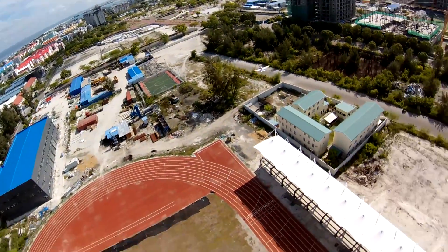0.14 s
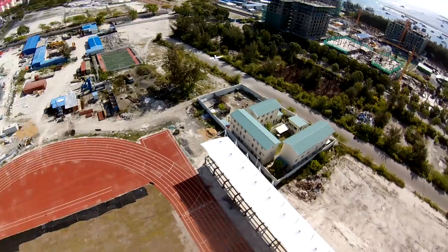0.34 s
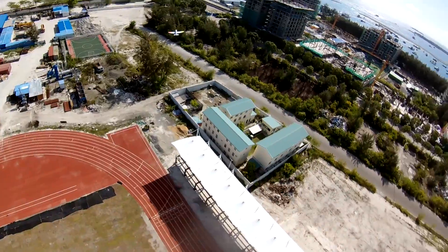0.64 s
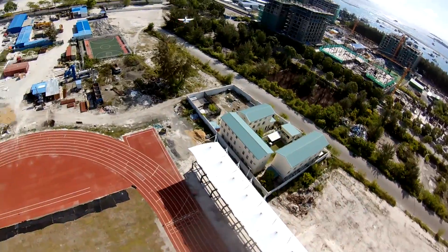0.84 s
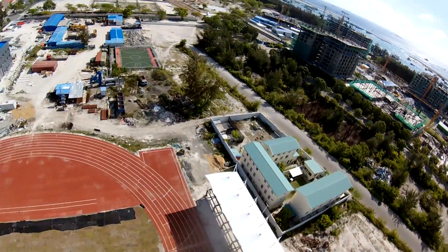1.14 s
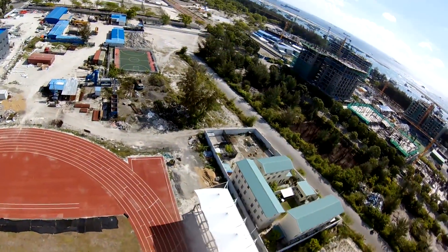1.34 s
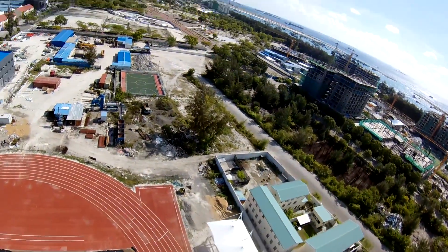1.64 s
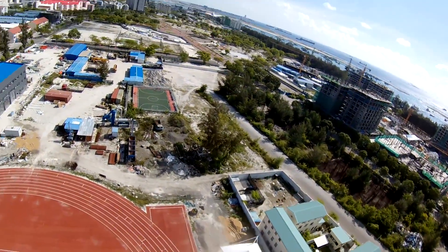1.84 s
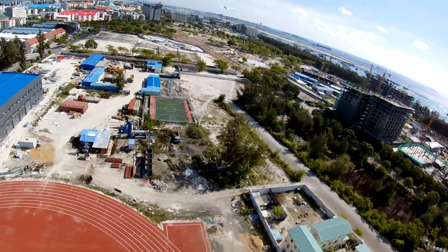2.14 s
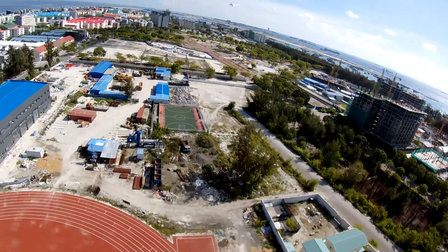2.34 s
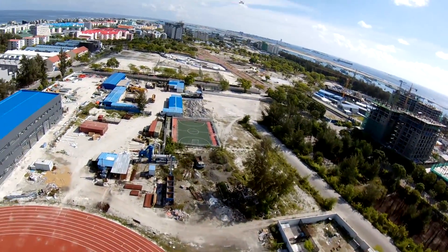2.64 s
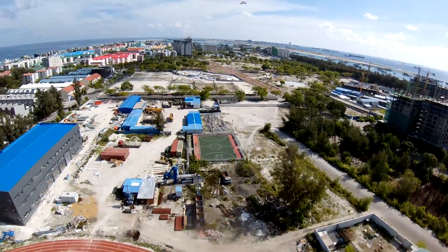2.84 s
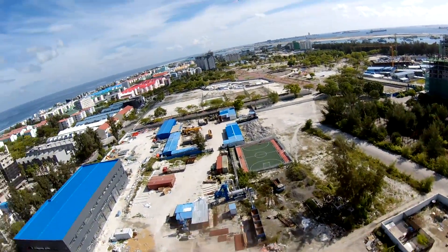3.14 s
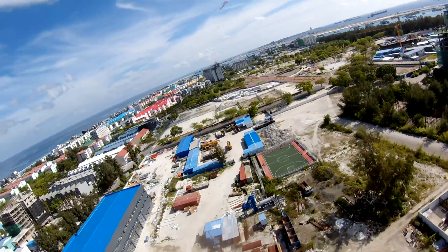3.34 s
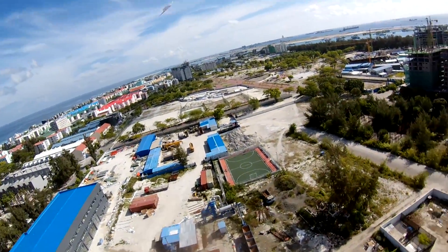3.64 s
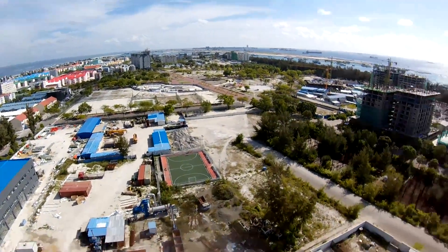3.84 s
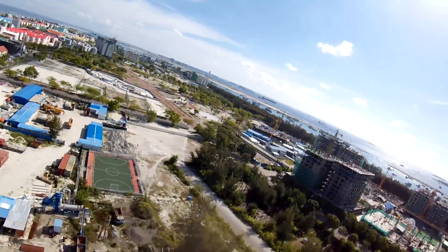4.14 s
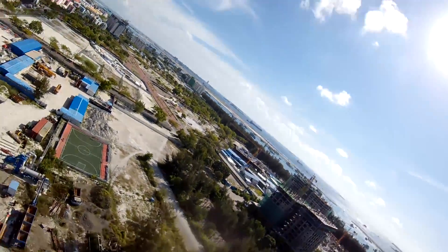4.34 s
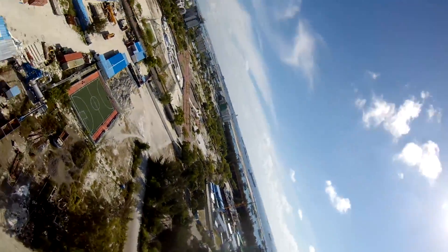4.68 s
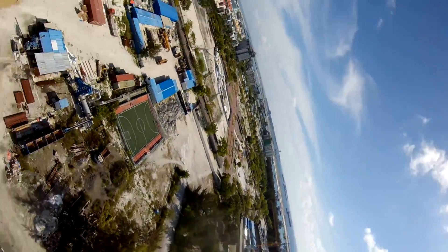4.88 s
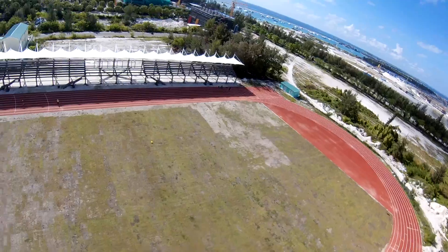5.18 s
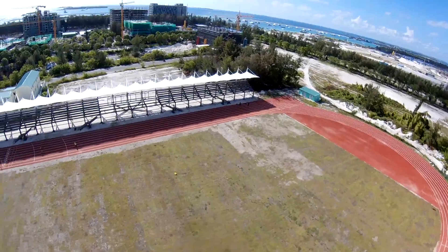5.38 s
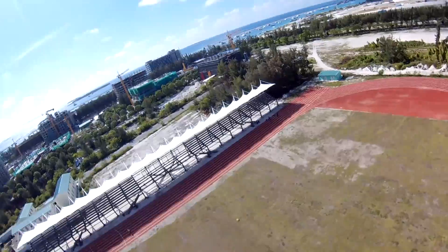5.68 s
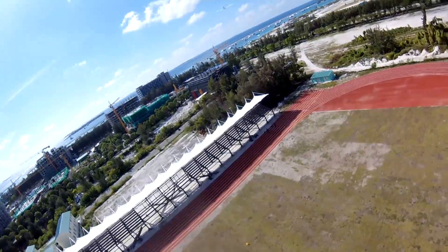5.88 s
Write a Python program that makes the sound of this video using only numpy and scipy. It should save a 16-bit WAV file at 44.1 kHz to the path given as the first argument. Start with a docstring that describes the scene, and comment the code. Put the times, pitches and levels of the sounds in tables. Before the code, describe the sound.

From the start, low-to-middle wind noise rushes over a microphone mounted on a gliding model plane, with short gusts swelling until about 1.4 s and the rush growing fuller after 1 s. A very faint whistle slides downward in the first 0.3 s; from about 1.1 to 3.4 s a similar thin, slightly wavering note with a weaker undertone rises gently and sinks again. At 3.45 s the electric motor catches, with a short nasal rasp near 3.6 s. It spools up in surges around 3.7 and 4.1 s, a gritty cluster of whines climbing above a growing low hum, steady by about 4.5 s, its whine easing while the wind strengthens. At 5.15 s a dry tick marks an abrupt cut: wind becomes louder and faster, the motor hums on steadily beneath, and from 5.6 s bright, spitting bursts crackle through buffeting gusts until 6 s.

```python
"""Air rushes past a microphone on a model plane: shaped noise whose level follows gusts of turbulence.
Over it a freewheeling propeller whistles faintly, a gliding sine with a weaker undertone.
The electric motor then throttles up: unbalance hums at the shaft rate, ball bearings whine at multiples
of it through the airframe's resonances, and the blades add narrow bands of noise.
A hard splice, marked by a tick, jumps to a faster, windier stretch with bright spitting gusts."""
import sys
import numpy as np
from scipy import signal
from scipy.fft import rfft, irfft
from scipy.io import wavfile

SR = 44100
rng = np.random.default_rng(int(sys.argv[2]) if len(sys.argv) > 2 else 0)


def master(y):
    """Save y as 16-bit WAV."""
    cut = np.clip(np.atleast_2d(y).T, -1, 1)
    pcm = np.round(cut * 32767)  # scale
    wavfile.write(sys.argv[1], SR, pcm.astype(np.int16))


N = 265318
TIME = np.arange(N) / SR
BINS_HZ = np.maximum(np.arange(N // 2 + 1) * SR / N, 1)
SPLICE_S, MOTOR_ON_S = 5.148, 3.45
FULL_TURNS_PER_S = 257   # reference shaft speed


def from_db(db):
    """Level: decibels become an amplitude ratio."""
    return 10 ** (np.asarray(db) / 20)


def rms_one(x):
    """Normalisation: scale a signal to rms 1."""
    return x / np.sqrt(np.mean(x ** 2) + 1e-20)


def in_time(rows):
    """Linear interpolation: each column of a timed table at every sample."""
    s, *columns = np.transpose(rows)
    return [np.interp(TIME, s, column) for column in columns]


def gain_at(points, hz):
    """Frequency response: the gain of a (f/Hz, level/dB) table, read on a log-frequency axis."""
    table_hz, table_db = np.transpose(points)
    return from_db(np.interp(np.log(hz), np.log(table_hz), table_db))


def noise(gains):
    """Spectral shaping: white noise with one gain per frequency bin, at rms 1."""
    return rms_one(irfft(rfft(rng.standard_normal(N)) * gains, N))


def drift(rate, size=8192):
    """Low-passed chance: a random curve of rms 1 that swings up to about `rate` times a second."""
    hz = np.arange(size // 2 + 1) * SR / N
    slow = irfft(rfft(rng.standard_normal(size)) / (1 + (hz / rate) ** 4))
    return np.interp(np.arange(N) * size / N, np.arange(size), rms_one(slow))


def tone(hz):
    """Phase is the integral of frequency: a sine of rms 1 that follows a pitch curve."""
    cycles = np.cumsum(hz) / SR + rng.random()
    return np.sqrt(2) * np.sin(2 * np.pi * cycles)


def swell(centre_s, length_s):
    """Gaussian envelope: a bell of height 1, `length_s` wide at half height."""
    return np.exp(-np.log(2) * (2 * (TIME - centre_s) / length_s) ** 2)


def low_pass(x, edge_hz, power):
    """Zero-phase low-pass: the gain falls to a half at the edge."""
    return irfft(rfft(x) / (1 + (BINS_HZ / edge_hz) ** power), N)


def after_splice():
    """Crossfade: 0 before the splice, 1 from a millisecond after it."""
    return np.clip((TIME - SPLICE_S) / .001, 0, 1)


def with_gusts(rush_db, hiss_db):
    """Unsteady flow: each gust or lull swells and fades on top of the steady level."""
    # gusts, and lulls where negative: centre t/s, length/s, added rush level/dB, added hiss level/dB
    gusts = [(0.217, 0.077, 1.5, 3), (0.306, 0.13, 2.5, -3), (0.428, 0.12, 3.5, 6.5), (.52, .06, 0.5, 2),
             (0.687, 0.2, 4.5, 3), (0.847, 0.031, 3, 1), (1.02, 0.077, 1, 4.5), (1.207, 0.13, 4, -0.5),
             (1.352, 0.1, 3, 0.5), (1.743, 0.24, -1.4, 1), (1.85, 0.064, 2.5, 1.8), (2.685, 0.22, 1.5, -2),
             (2.915, 0.039, 2.5, -4.5), (3.117, 0.05, 2.5, -1.5), (3.297, .07, -1.5, 1),
             (3.383, 0.081, 0.7, 1), (3.7, 0.054, 0.5, -0.5), (3.793, 0.11, -2, 0.5), (4.246, 0.23, 1.5, 2),
             (5.187, 0.073, 1, 1.5), (5.544, 0.14, 4, -1), (5.68, 0.043, -0.5, -2), (5.744, .02, 1, -1.5),
             (5.828, 0.029, 2.5, -1.5), (5.886, 0.052, 5.5, -0.5), (5.98, 0.08, 0, -1.5)]
    for s, length_s, more_rush_db, more_hiss_db in gusts:
        bell = swell(s, length_s)
        rush_db = rush_db + more_rush_db * bell
        hiss_db = hiss_db + more_hiss_db * bell
    return rush_db, hiss_db


def deepened(rush):
    """Spectral balance: the weight of the rush tips between its bass and its middle."""
    # stretches of deeper rush: centre t/s, length/s, added bass-to-middle level difference/dB
    deep_spells = [(1.152, 0.31, 2.5), (1.996, .5, 1.5), (3.55, 0.62, 4), (4.105, 0.81, 1.5)]
    depth_db = sum(db * swell(s, length_s) for s, length_s, db in deep_spells)
    depth_db = depth_db + 1.9 * drift(15)   # eddies tip the balance at random
    bass = low_pass(rush, edge_hz=720, power=4)
    middle = rush - bass
    return bass * from_db(depth_db / 2) + middle * from_db(-depth_db / 2)


def airflow(steady_db, colour, split_hz, buffet_db, flutter_db):
    """Turbulence: large eddies rush and buffet; small ones hiss above them and flutter faster."""
    rush_db, hiss_db = with_gusts(*steady_db)
    low_share = 1 / (1 + (BINS_HZ / split_hz) ** 6)   # share of power in the rush
    shape = gain_at(colour, BINS_HZ)
    buffet = buffet_db * drift(39)
    rush = deepened(noise(shape * np.sqrt(low_share))) * from_db(rush_db + buffet)
    flutter = flutter_db * drift(79)
    hiss = noise(shape * np.sqrt(1 - low_share)) * from_db(hiss_db + buffet + flutter)
    return rush + hiss


def spitting():
    """Flow separation: at high airspeed the flow tears off the microphone port in short bright bursts."""
    # spectrum of the torn flow: f/Hz, relative spectral level/dB
    spit_colour = [(2500, -14.5), (4500, 7), (5700, 2), (6600, -17.5), (8500, -18.5), (11000, -35.5),
                   (14000, -53)]
    # sharp gusts at the port: centre t/s, length/s, peak level/dB
    spits = [(5.59, 0.03, -54), (5.613, .006, -51), (5.643, .022, -56), (5.715, 0.031, -55),
             (5.77, .014, -56), (5.805, 0.045, -51), (5.85, 0.025, -53.5), (5.892, .035, -53)]
    bed_db, flutter_db = -62.5, 4
    flutter = from_db(flutter_db * drift(120))
    spit_noise = rms_one(noise(gain_at(spit_colour, BINS_HZ)) * flutter)
    bursts = sum(from_db(level_db) * swell(s, length_s) for s, length_s, level_db in spits)
    return spit_noise * (from_db(bed_db) + bursts)


def wind():
    """Aerodynamic noise: a slower airflow gives way to a faster, spitting one at the splice."""
    # airflow spectra before and after the splice: f/Hz, relative spectral level/dB
    glide_colour = [(30, -59.5), (70, -33), (130, -18.5), (220, -6), (340, 1), (600, 2), (1200, -3),
                    (1900, -15.5), (2350, -19), (4000, -35), (5600, -54), (6600, -74), (9000, -72.5),
                    (13000, -92.5)]
    fast_colour = [(30, -55), (70, -32), (130, -17), (220, -6), (340, 2), (820, 2), (1300, -3), (1900, -12),
                   (2400, -14), (4000, -26), (5600, -44), (6600, -71.5), (9000, -65.5), (13000, -92)]
    # slow trend of the airflow up to the splice: t/s, rush level/dB, hiss level/dB
    air_trend = [(0.1, -33.5, -48.5), (0.55, -33.5, -45), (1.1, -28, -40.5), (1.6, -27.5, -39),
                 (2.1, -27.5, -42.5), (2.9, -29.5, -40), (3.35, -28, -46.5), (3.65, -28, -41),
                 (3.9, -32, -41.5), (4.6, -32, -44), (5.13, -26, -38.5)]
    fast_db = (-23, -34.5)   # rush and hiss levels without gusts
    glide = airflow(in_time(air_trend), glide_colour, split_hz=2030, buffet_db=0.14, flutter_db=1.25)
    fast = airflow(fast_db, fast_colour, split_hz=1920, buffet_db=0.5, flutter_db=1.56) + spitting()
    after = after_splice()
    return (1 - after) * glide + after * fast


def splice_tick(level_db, decay_s):
    """Waveform step: the cut between two stretches leaves a jump that decays exponentially, a small dry tick."""
    since = np.maximum(TIME - SPLICE_S, 0)
    return from_db(level_db) * (TIME >= SPLICE_S) * np.exp(-since / decay_s)


def freewheel(waver_db):
    """Air-driven rotation: the bearing sings a thin note and a weaker undertone along a pitch parabola."""
    # whistling spells: middle t/s, length/s, mean main-note level/dB, f/Hz at the middle, glide there/(Hz/s)
    whistles = [(.17, .32, -51.5, 2165, -500), (2.25, 2.3, -51.5, 2295, 0)]
    bend_hz_per_s2, undertone_ratio, undertone_db = -128, 0.54, -2
    out = 0
    for s, length_s, level_db, hz, glide in whistles:
        since = TIME - s
        curve_hz = hz + glide * since + bend_hz_per_s2 * since ** 2
        pitch = curve_hz * (1 + 0.00064 * drift(22))
        held = 1 / (1 + (2 * since / length_s) ** 8)
        notes = tone(pitch) + from_db(undertone_db) * tone(undertone_ratio * pitch)
        out = out + notes * held * from_db(level_db + waver_db * drift(11))
    return out


def start_rasp(level_db, delay_s, length_s, centre_hz, width_hz):
    """Resonance: as the motor catches, noise rasps briefly at the airframe's main resonance."""
    resonance = 1 / (1 + (2 * (BINS_HZ - centre_hz) / width_hz) ** 2)
    return noise(resonance) * from_db(level_db) * swell(MOTOR_ON_S + delay_s, length_s)


def shaft_speed():
    """Rotational inertia: each push eases the turns per s up; after the splice they sink to a cruise."""
    # pushes of the throttle: centre t/s, speed gained/(turns/s), easing time/s
    pushes = [(3.705, 60.611, 0.147), (4.047, 16.41, 0.066), (4.167, 66.39, 0.202), (4.987, 4.264, 0.126)]
    idle, after_jump, cruise_floor = 114.1, 258.1, 254.2   # turns per s
    slowing = 7   # turns per s, each second
    climb = idle
    for s, gained, easing_s in pushes:
        climb = climb + gained * (1 + np.tanh((TIME - s) / easing_s)) / 2
    cruise = np.maximum(after_jump - slowing * (TIME - SPLICE_S), cruise_floor)
    return np.where(TIME < SPLICE_S, climb, cruise)


def blades(speed):
    """Amplitude modulation: blades chop turbulent air into narrow noise bands that climb with the shaft."""
    # blurred blade tones: multiple of shaft speed, level/dB at the reference speed, fluctuation rate/Hz
    blade_tones = [(2.09, -39, 26.3), (3.14, -41, 26.1)]
    growth_db_per_octave = 1.5
    out = 0
    for order, level_db, rate_hz in blade_tones:
        angle = 2 * np.pi * order * np.cumsum(speed) / SR
        band = drift(rate_hz) * np.cos(angle) + drift(rate_hz) * np.sin(angle)
        out = out + from_db(level_db) * band
    return out * from_db(growth_db_per_octave * np.log2(speed / FULL_TURNS_PER_S))


def unbalance_hum(speed):
    """Rotating unbalance: one cycle of force a turn, stronger with speed and weaker under a lighter load."""
    full_db, db_per_turn_per_s, after_splice_db = -25, 0.3, -5
    level_db = full_db + db_per_turn_per_s * (speed - FULL_TURNS_PER_S) + after_splice_db * after_splice()
    return tone(speed) * from_db(level_db + 0.36 * drift(10))


def softened(vibration, speed):
    """Impact hardness: slow balls strike softly, so the treble grows with a power of speed."""
    dull = low_pass(vibration, edge_hz=3200, power=8)
    treble = vibration - dull
    return dull + treble * (speed / FULL_TURNS_PER_S) ** 1.6


def bearings(speed, grit_db, grit_edge_hz):
    """Forced vibration: slipping balls drive tones and rolling grit through the airframe's response."""
    # how the airframe radiates vibration: f/Hz, gain level/dB
    airframe = [(150, -12), (300, 0), (800, 0), (1300, -4), (1700, -7), (2000, -3), (2320, 4), (2550, -2),
                (2800, -13), (3100, -17), (3400, -13), (3900, -9), (4400, -12), (4650, -18), (4900, -29),
                (6500, -60), (12000, -90)]
    # bearing tones: multiple of shaft speed, drive level/dB before airframe and load,
    # speed of strongest drive/(turns/s), half-width of that drive/octaves, waver/dB
    bearing_tones = [(1.1, -45, 258, .15, 2), (2.02, -39, 228, .09, 1.5), (2.9, -36, 143, .1, 2),
                     (3.01, -38, 182, .13, 2), (3.09, -38.5, 247, .055, 2), (3.85, -38.5, 161, .08, 2),
                     (5, -44, 264, .07, 2), (6.03, -40, 248, .04, 2), (6.14, -46, 259, .04, 2),
                     (7.1, -44.5, 230, .14, 2), (7.73, -44, 256, .11, 1.5), (8.55, -52, 245, .12, 2),
                     (9.21, -38.7, 229, .21, .5), (9.25, -45, 171, .07, 1.5), (10.17, -46.5, 175, .24, 1.5),
                     (10.75, -51, 204, .14, 1.5), (11.3, -46.5, 209, .09, 1.5), (11.6, -50, 183, .14, 1.5),
                     (11.98, -44, 251, .06, 2), (12.26, -40.5, 192, .125, .7), (12.3, -47, 163, .07, 1),
                     (12.62, -46.5, 245, .14, 2), (13.3, -55, 165, .2, 2), (13.7, -53, 173, .13, 2),
                     (14.33, -50, 162, .1, 1), (14.97, -42.5, 258, .048, 1.5), (15.3, -45, 160, .17, 1),
                     (15.68, -43.5, 214, .13, 1), (15.71, -47.5, 259, .05, 1.5),
                     (16.48, -49, 235, .14, 1.5), (16.95, -55.5, 260, .1, 2), (17.46, -47, 129, .05, 2),
                     (17.95, -40.5, 154, .06, 1), (18.03, -43.5, 218, .13, 1), (18.74, -40.5, 205, .2, 1),
                     (19.57, -49, 191, .11, 1.5), (20.3, -54, 204, .1, 2), (21.07, -46.5, 170, .15, 1.5),
                     (21.8, -44, 192, .18, 1), (22.66, -48.5, 172, .1, 1.5), (24.13, -43, 161, .09, 1),
                     (24.55, -44, 142, .07, 1.5), (24.87, -47, 163, .17, 1), (25.65, -48.5, 158, .09, 1.5),
                     (27.1, -46.5, 152, .07, 1.5), (27.84, -49.5, 154, .09, 1.5), (26.4, -44, 119, .07, 2),
                     (30.6, -52, 142, .07, 2), (34.1, -48, 124, .09, 2)]
    slip_share, spooling_slip_share = 0.001, 0.0036   # pitch wander at full speed; its rise toward standstill
    shared_slip = .85   # part of the wander that all the balls have in common
    load_db, after_splice_db = 1.5, -2.5
    ease_s, ease_db_per_s = 4.51, 5   # once up to speed the bearings quieten, until the splice

    looseness = slip_share + spooling_slip_share * np.maximum(1 - speed / FULL_TURNS_PER_S, 0)
    whine, together = 0, drift(14)
    for order, level_db, best_speed, octaves, depth_db in bearing_tones:
        hz = order * speed
        slip = looseness * (shared_slip * together + (1 - shared_slip) * drift(30))
        waver_db = depth_db * drift(18)
        excited = 1 / np.sqrt(1 + (np.log2(speed / best_speed) / octaves) ** 8)
        # each tone also swells as it climbs through a resonance
        strength = excited * from_db(level_db + waver_db) * gain_at(airframe, hz)
        whine = whine + tone(hz * (1 + slip)) * strength

    high_pass = 1 / (1 + (grit_edge_hz / BINS_HZ) ** 4)
    grit = from_db(grit_db) * noise(gain_at(airframe, BINS_HZ) * high_pass)
    settled_s = np.clip(TIME, ease_s, SPLICE_S) - ease_s
    bearing_db = load_db - ease_db_per_s * settled_s + after_splice_db * after_splice()
    return from_db(bearing_db) * softened(whine + grit * speed / FULL_TURNS_PER_S, speed)


def motor(grit_db, grit_edge_hz):
    """Order-locked sound: hum, blade bands and bearing tones all follow one shaft speed."""
    attack_s = 0.23
    running = np.clip((TIME - MOTOR_ON_S) / attack_s, 0, 1)
    speed = shaft_speed()
    return running * (unbalance_hum(speed) + blades(speed) + bearings(speed, grit_db, grit_edge_hz))


def scene():
    """Superposition: wind, whistle and motor add at the microphone, and the splice adds its tick."""
    drive = freewheel(waver_db=1.2) + motor(grit_db=-46.5, grit_edge_hz=1600)
    drive = drive + start_rasp(level_db=-43, delay_s=0.12, length_s=0.12, centre_hz=2300, width_hz=280)
    return (wind() + drive + splice_tick(level_db=-17.5, decay_s=0.00049))[None]


def record(dry):
    """Linear filtering: one narrow notch, then a steep low-pass."""
    notch_hz, notch_width_hz, cutoff_hz = 703, 37, 16000
    notched = signal.lfilter(*signal.iirnotch(notch_hz, notch_hz / notch_width_hz, fs=SR), dry)
    # 70 dB down from the cutoff upward
    return signal.sosfilt(signal.cheby2(12, 70, cutoff_hz, fs=SR, output="sos"), notched)


dry = scene()
out = record(dry)
master(out)
```